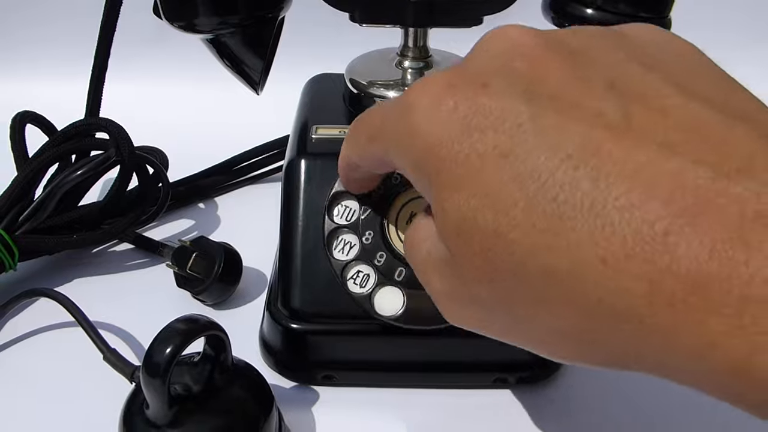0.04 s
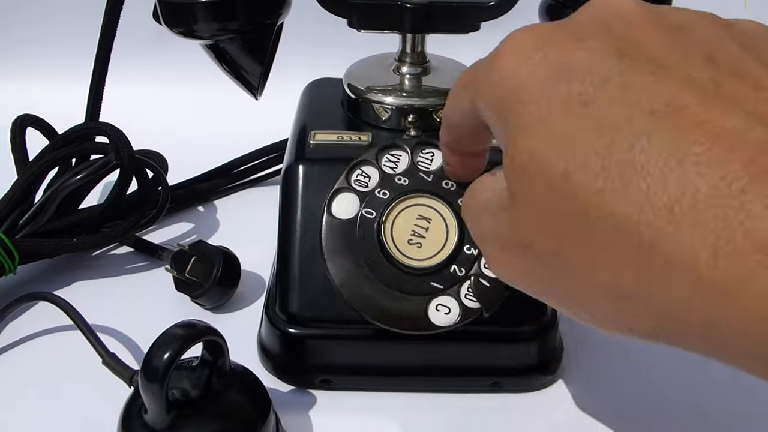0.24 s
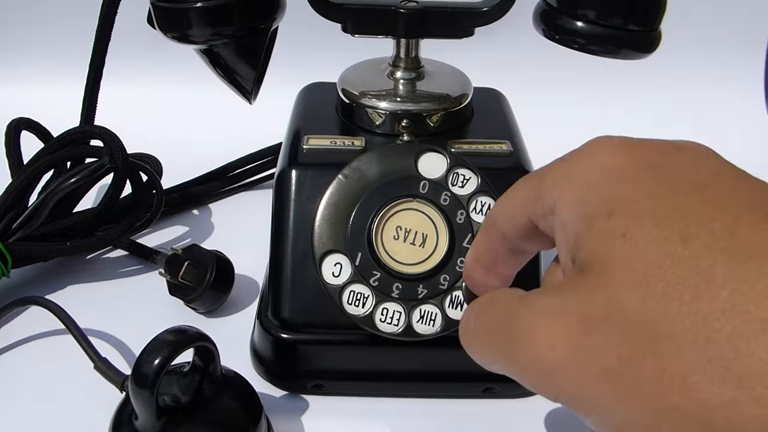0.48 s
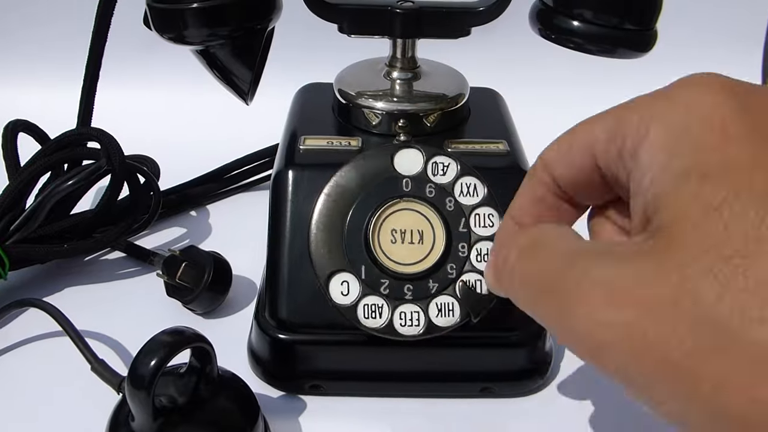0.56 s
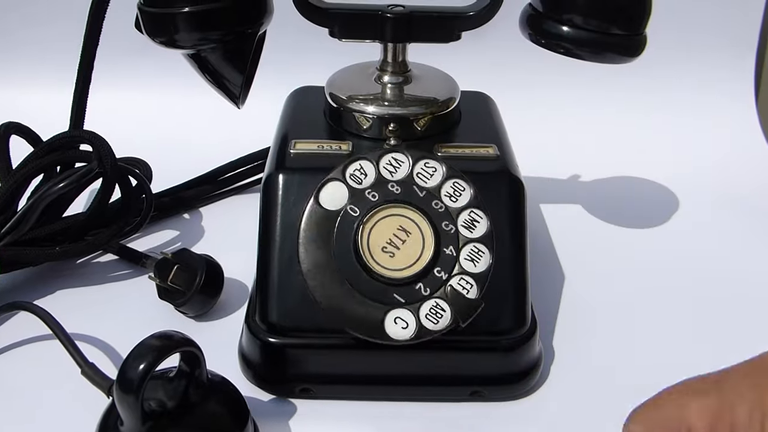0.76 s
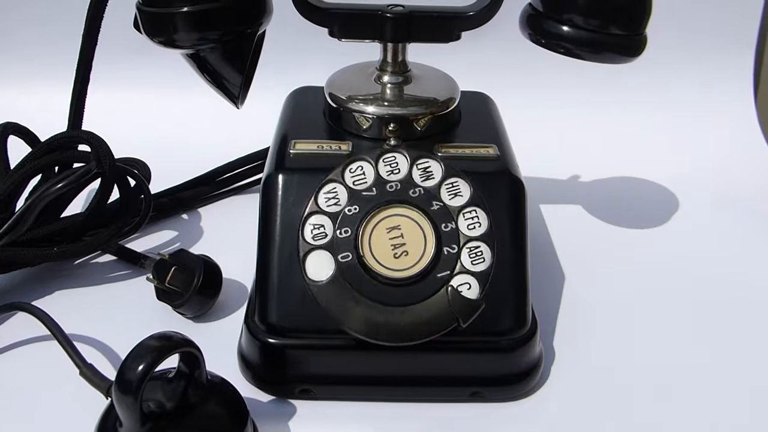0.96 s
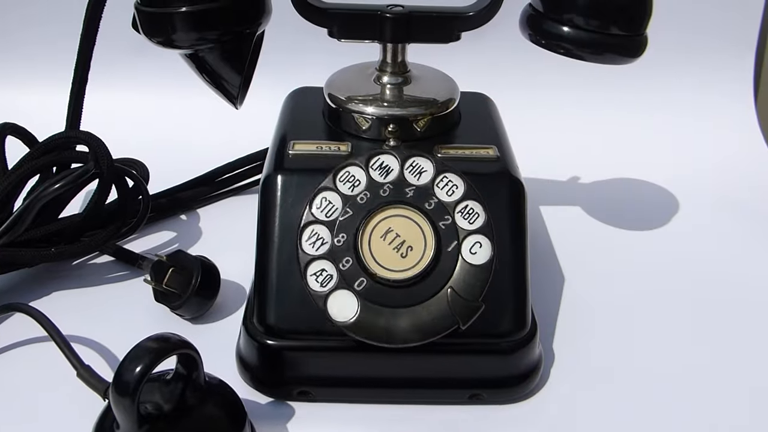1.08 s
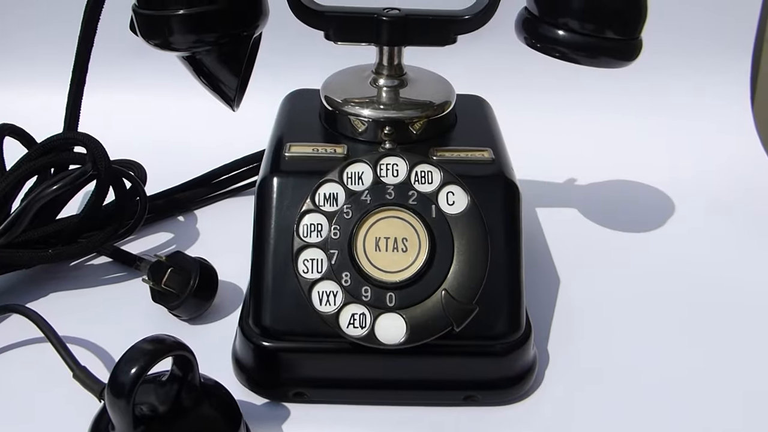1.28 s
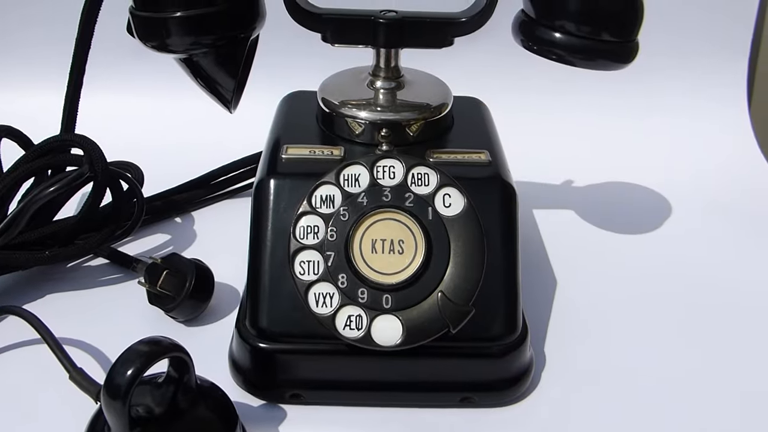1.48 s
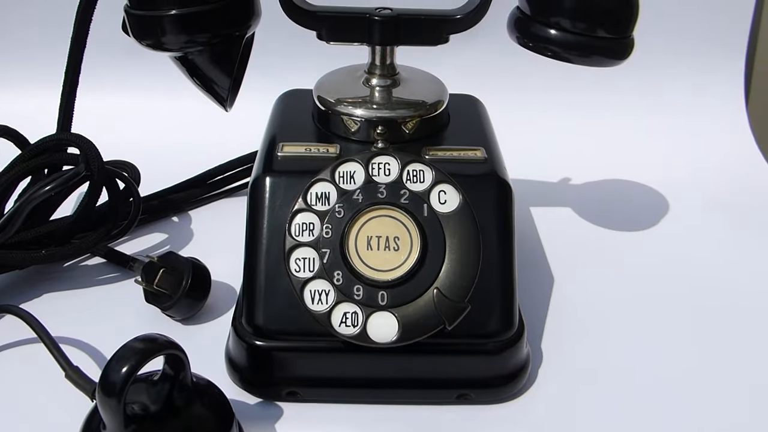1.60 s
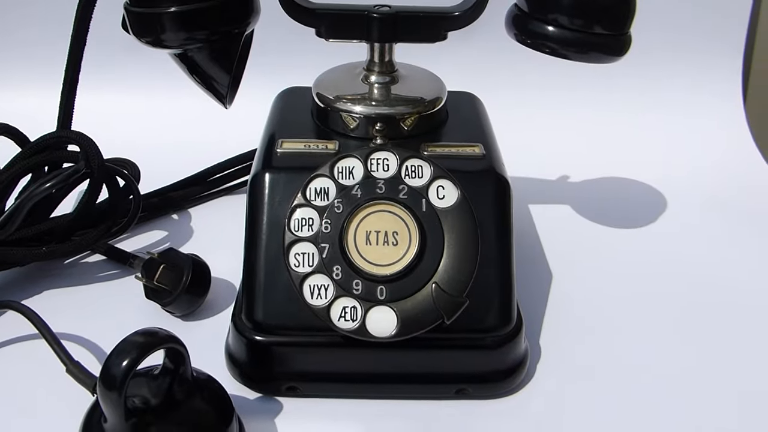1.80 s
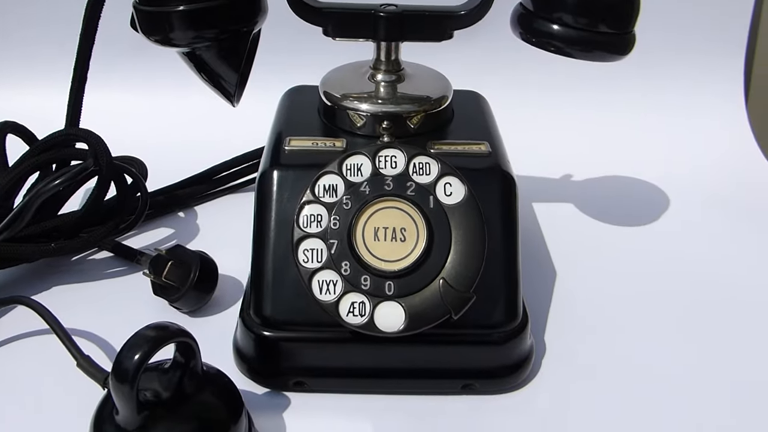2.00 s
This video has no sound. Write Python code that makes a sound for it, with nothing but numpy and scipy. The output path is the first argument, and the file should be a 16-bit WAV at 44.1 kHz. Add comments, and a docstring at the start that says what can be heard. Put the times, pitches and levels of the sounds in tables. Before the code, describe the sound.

An old rotary phone dial is wound with quick ticks and whirs home.

```python
"""A quiet room, close to an old rotary telephone on which one digit is dialled.
A pawl ticks over its ratchet as the wheel is wound. The wheel clacks at the finger stop and again as it
is let go, whirs home against its governor with chirps and squeaks, then clacks and clicks to rest.
The contacts ring the metal dial, and the clacks also ring the case. Under it lie a few dull bumps,
outdoor air and a faint distant engine; a low hum swells at the end."""
import sys
import numpy as np
from scipy import signal
from scipy.fft import rfft, irfft
from scipy.io import wavfile
from scipy.ndimage import uniform_filter1d

SR = 44100
rng = np.random.default_rng(int(sys.argv[2]) if len(sys.argv) > 2 else 0)


def master(y):
    """Save y as 16-bit WAV."""
    cut = np.clip(np.atleast_2d(y).T, -1, 1)
    pcm = np.round(cut * 32767)  # scale
    wavfile.write(sys.argv[1], SR, pcm.astype(np.int16))


N = 90404

# ringing modes of the metal dial (frequency [Hz], level [dB], t60 [s])
DIAL_MODES = [(2700, -9, .06), (3060, -7, .07), (3200, -5, .07), (3570, -10, .05), (4020, -7, .07),
              (4470, -8, .06), (5100, -2, .13), (5690, -8, .05), (6650, -9, .07), (7960, -3, .11),
              (8516, -7, .11)]


def amp(db):
    """Decibels to gain."""
    return 10 ** (np.asarray(db) / 20)


def clock():
    """Time of every sample, in seconds."""
    return np.arange(N) / SR


def curve(rows, column=1):
    """An automation curve: straight lines between points in time."""
    rows = np.array(rows)
    return np.interp(clock(), rows[:, 0], rows[:, column])


def over_bins(rows, column=1):
    """Spread a column of a frequency table over the FFT bins, on a log-frequency scale."""
    rows = np.array(rows)
    bin_hz = np.arange(N + 1) * SR / (2 * N)
    return np.interp(np.log(bin_hz + 1), np.log(rows[:, 0]), rows[:, column])


def shape(x, gain):
    """Filter by a gain for each bin."""
    return irfft(rfft(x, 2 * N) * gain)[..., :N]


def colour(x, rows):
    """Minimum-phase EQ, so nothing sounds ahead of an attack; keeps the power of white noise."""
    gain = amp(over_bins(rows))
    gain /= np.sqrt(np.mean(gain ** 2))
    cepstrum = irfft(np.log(gain))
    cepstrum[1:N] *= 2
    cepstrum[N + 1:] = 0
    return shape(x, np.exp(rfft(cepstrum)))


def fade(t, t60):
    """Exponential decay, 60 dB down after t60 seconds."""
    return np.exp(-np.log(1000) * np.maximum(t, 0) / t60)


def ring(x, modes):
    """Drive a set of decaying modes; keeps the power of white noise."""
    t = clock()[:N // 4]
    response = sum(amp(db) * np.sin(2 * np.pi * hz * t) * fade(t, t60) / np.sqrt(t60)
                   for hz, db, t60 in modes)
    return shape(x, rfft(response / np.linalg.norm(response), 2 * N))


def diffuse(x, t60):
    """A dense reverb tail made of decaying noise."""
    response = rng.standard_normal(N) * fade(clock(), t60)
    return shape(x, rfft(response / np.linalg.norm(response), 2 * N))


def blow(start, db, rise, t60):
    """Force envelope of one contact: a quick rise, then decay (times in seconds)."""
    t = clock() - start
    return amp(db) * np.clip(t / rise, 0, 1) * fade(t - rise, t60)


def tap(force):
    """The whole energy of a contact as one push at its peak."""
    return np.linalg.norm(force) * (np.arange(N) == np.argmax(force))


def drift(rate_hz):
    """Smooth random wander, spread near 1."""
    hold = int(SR / rate_hz)
    steps = np.repeat(rng.standard_normal(N // hold + 1), hold)
    return uniform_filter1d(steps, hold)[:N]


def chatter():
    """Even, very fast chatter of two hard surfaces in contact, rms 1."""
    return rng.choice([-1., 1.], N)


def grit(grains_per_s=4600, flurry_db=1.72):
    """Dense tiny collisions of uneven size that come in brief flurries, rms 1."""
    hits = rng.random(N) < grains_per_s / SR
    size_db = np.minimum(rng.exponential(size=N), 5) + flurry_db * drift(rate_hz=200)
    grains = hits * rng.choice([-1, 1], N) * amp(size_db)
    return grains / np.std(grains)


def wavering_tone(hz, waver=0.029, rate_hz=600):
    """A sine of amplitude 1 whose pitch wanders by about the fraction `waver`."""
    pitch_hz = hz * (1 + waver * drift(rate_hz))
    return np.sin(2 * np.pi * np.cumsum(pitch_hz) / SR)


def outdoor_air(end_db=-49.5, fade_db_per_s=2.5):
    """A stereo bed of distant outdoor noise, slowly fading."""
    # tone of the air (frequency [Hz], relative level [dB])
    air_eq = [(25, -63), (50, -35), (75, -19.5), (110, -16.5), (160, -14.5), (220, -5), (330, -7),
              (550, -11.5), (900, -10.5), (1300, -17.5), (3000, -29.5), (8000, -31.5), (9000, -35.5),
              (16000, -44)]
    # stereo width (frequency [Hz], side minus mid [dB])
    width = [(40, -4), (130, -20.5), (300, -22.5), (640, -9), (1400, -7.5), (8000, -4)]
    mid, side = colour(rng.standard_normal((2, N)), air_eq)
    side = shape(side, amp(over_bins(width)))
    level_db = end_db + fade_db_per_s * (N / SR - clock())
    return np.array([mid + side, mid - side]) * amp(level_db)


def engine_drone():
    """A distant engine swells and ebbs as its pitch sinks."""
    # course of the drone (time [s], pitch [Hz], rms level [dB])
    course = [(0, 160.6, -75), (.35, 157, -52.5), (.6, 155, -68.5), (1.2, 151, -55.5), (1.45, 147.7, -59.5),
              (1.68, 145.8, -55), (2.05, 130.3, -67)]
    tone = wavering_tone(curve(course), waver=0.0081, rate_hz=11.5)
    return np.sqrt(2) * tone * amp(curve(course, column=2))


def clicks():
    """Small metal parts click as the works take up or settle, leaving the dial ringing faintly."""
    # light contacts (time [s], level [dB])
    contacts = [(0.038, -42), (0.0458, -25.5), (1.484, -43.5), (1.524, -44), (1.5437, -37.5), (1.556, -37),
                (1.5634, -20), (1.593, -39.5), (1.616, -51.5)]
    # tone of a click (frequency [Hz], relative level [dB])
    click_eq = [(710, -28), (1200, -6.5), (2080, -5.5), (2500, -8), (3050, 0), (3600, -5.5), (4050, 7.5),
                (4400, -3), (5470, -1), (7170, -4), (8200, 7), (9200, -19.5), (11600, -14), (16000, -22)]
    blows = [blow(start, db, rise=0.0011, t60=0.038) for start, db in contacts]
    snap = colour(chatter() * sum(blows), click_eq)
    return snap + amp(-10.5) * ring(sum(map(tap, blows)), DIAL_MODES)


def winding(rise_s=0.00059):
    """The pawl ticks faster as the wheel speeds up and pings at each fall, over the rub of the gears."""
    # the pawl falling over the ratchet teeth (time [s], level [dB])
    falls = [(0.082, -39), (0.129, -42.5), (0.1607, -35), (0.1886, -41), (0.2087, -31), (0.2301, -28),
             (0.2504, -27.5), (0.268, -27), (0.2843, -41), (0.297, -27.5), (0.313, -30), (0.3248, -27.5),
             (0.3415, -23.5), (0.362, -28), (0.37, -28.5), (0.383, -26.5), (0.3957, -23), (0.407, -20.5),
             (0.414, -36.5), (0.4202, -32), (.4316, -25.5), (0.446, -23.5), (0.458, -31.5), (0.4647, -28),
             (.482, -31), (0.494, -26.5), (0.4994, -30), (0.507, -35), (.520, -25.5)]
    # the pawl's own note, rising as the spring tightens (time [s], pitch [Hz])
    pawl_note = [(.3, 3087), (.42, 3206)]
    # tone of a tick (frequency [Hz], relative level [dB])
    tick_eq = [(500, -26), (1500, -0.5), (2500, -8.5), (4000, 1.5), (6200, 2.5), (7300, 2), (8500, -1),
               (9100, -20.5), (10800, -15), (15500, -20)]
    # rubbing of the gears (time [s], level [dB])
    rub_levels = [(0, -68), (.15, -62.5), (.2, -45), (.29, -41.5), (.36, -36.5), (.43, -38), (.525, -37.5),
                  (.575, -45), (.605, -43), (.625, -51)]
    # tone of the rub (frequency [Hz], relative level [dB])
    rub_eq = [(300, -21.5), (600, 3), (812, -8), (1030, 0.5), (2050, 0.5), (2470, -2.5), (3100, -0.5),
              (3500, -6), (6200, -0.5), (8500, -9), (9200, -18.5), (11000, -19), (15500, -23)]
    t = clock()
    ticks = chatter() * sum(blow(start, db, rise_s, t60=0.026) for start, db in falls)
    rub = grit() * amp(curve(rub_levels)) * (t < rub_levels[-1][0])
    pings = np.zeros(N)
    for start, tick_db in falls:
        hz = np.interp(start, *np.transpose(pawl_note))
        ping_db = -19 + 0.5 * tick_db  # the pings are more even than the ticks
        pings += blow(start, ping_db, rise_s, t60=0.048) * np.sin(2 * np.pi * hz * (t - start))
    dial = ring(amp(-15) * ticks + amp(-6) * rub, DIAL_MODES)
    return colour(ticks, tick_eq) + colour(rub, rub_eq) + pings + dial


def clacks():
    """Hard blows on the finger stop, or drier ones inside the works, ring the dial and the case."""
    # the wheel striking and rattling at its stops
    # (time [s], level [dB], rise [s], t60 [s], send to the case [dB], part struck)
    strikes = [(0.531, -9.5, 0.00098, 0.0051, -29, "stop"), (.534, -23, 0.001, 0.043, -7.5, "stop"),
               (0.5437, -20.5, 0.0012, 0.044, -28, "stop"), (0.5457, -13, 0.00554, 0.037, -22.5, "stop"),
               (0.61, -31, 0.00031, 0.012, -6, "stop"), (0.6224, -18.5, 0.0024, 0.043, -32, "stop"),
               (.627, -13.5, 0.0013, 0.02, -12, "stop"), (0.638, -27, 0.00107, 0.047, -1.5, "stop"),
               (1.373, -16, 0.00082, 0.017, -6.5, "works"), (1.3755, -13, 0.0004, 0.02, -35, "works"),
               (1.3809, -13.5, 0.0022, 0.043, -22, "works")]
    # tone of the finger stop (frequency [Hz], relative level [dB])
    stop_eq = [(180, -42), (300, -15), (488, -12.5), (1310, -12), (1700, -18.5), (2030, -6.5), (2440, -10),
               (3200, 1.5), (3700, -3), (4450, 2.5), (4930, -6.5), (5640, -1), (7380, 0), (8440, -1.5),
               (9330, -19), (11600, -9), (15700, -16), (16500, -41)]
    # tone of the works (frequency [Hz], relative level [dB])
    works_eq = [(180, -38), (462, -9), (814, -22), (1230, -11), (1400, -21.5), (1690, -9), (2200, -27),
                (2740, 1), (3000, 4), (3500, -7), (4910, -7), (5800, -6), (7200, -11), (8100, -5.5),
                (9240, -22.5), (11000, -19.5), (16000, -24)]
    # ringing modes of the case (frequency [Hz], level [dB], t60 [s])
    case_modes = [(265, -10.5, 0.11), (457.5, 1, 0.08), (706, -5, 0.038), (1127, -4, 0.12),
                  (1290, -3.5, 0.099)]
    out = np.zeros(N)
    for part, eq, dial_db in (("stop", stop_eq, -15), ("works", works_eq, -21)):
        blows = [(blow(start, db, rise, t60), amp(case_db))
                 for start, db, rise, t60, case_db, struck in strikes if struck == part]
        force = chatter() * sum(push for push, _ in blows)
        shove = sum(tap(push) * send for push, send in blows)
        crack = colour(force + amp(-29) * diffuse(force, t60=0.088), eq)
        out += crack + amp(dial_db) * ring(force, DIAL_MODES) + ring(shove, case_modes)
    return out


def governor(turn_hz=20.87, tooth_hz=127):
    """The spinning brake whirs in its cup, pulsing with each turn and each gear tooth."""
    # rubbing of the brake on the way home (time [s], level [dB])
    rub_levels = [(.65, -42.5), (.70, -36), (.725, -31.5), (.815, -30.5), (.83, -35), (.86, -29.5),
                  (.918, -32.5), (.937, -30.5), (.975, -33.5), (1.02, -31.5), (1.045, -28), (1.12, -30.5),
                  (1.235, -32.5), (1.255, -36), (1.269, -28.5), (1.305, -36), (1.338, -31), (1.375, -38)]
    # tone of the whir (frequency [Hz], relative level [dB])
    whir_eq = [(240, -30.5), (400, -7), (595, -11.5), (942, -14.5), (1280, -5), (1960, -8), (2400, -11.5),
               (2700, 2), (3050, -3), (3360, -4), (4090, -2.5), (4560, -13.5), (5100, -2.5), (5390, -15),
               (5730, -1.5), (6190, -9), (6700, -6), (7500, -9), (8280, -6), (9210, -20), (10600, -14),
               (15500, -27)]
    t = clock()
    wobble_db = 0.88 * np.cos(2 * np.pi * turn_hz * (t - 1.19))  # it runs slightly out of true
    tooth_phase = np.cumsum(tooth_hz * (1 + 0.032 * drift(rate_hz=7.2))) / SR % 1
    tooth_db = -0.75 - 3 * tooth_phase
    running = (t > rub_levels[0][0]) & (t < rub_levels[-1][0])
    rub = grit() * running * amp(curve(rub_levels) + wobble_db + tooth_db)
    return colour(rub, whir_eq) + amp(-16) * ring(rub, DIAL_MODES)


def cam_chirps(pulses=6, first_s=0.86, period_s=0.089):
    """The cam gives one high stick-slip chirp for each dialling pulse."""
    envelope = sum(blow(first_s + k * period_s, db=-29, rise=0.004, t60=0.068) for k in range(pulses))
    return envelope * wavering_tone(hz=7040)


def brake_squeaks():
    """The brake catches now and then on the way home with a short stick-slip squeak."""
    # catches of the brake (time [s], level [dB])
    catches = [(.860, -39), (.930, -32), (1.146, -35), (1.218, -30), (1.266, -26.5)]
    envelope = sum(blow(start, db, rise=0.004, t60=0.11) for start, db in catches)
    return envelope * wavering_tone(hz=2960)


def bumps():
    """Soft knocks, each with a short low boom at its own pitch."""
    # dull knocks (time [s], level [dB], t60 [s], boom against knock [dB], boom pitch [Hz])
    knocks = [(1.028, -21.5, 0.063, -3, 236.6), (1.047, -26.5, 0.047, -4, 295),
              (1.062, -28.5, 0.034, 3, 185), (1.07, -32, 0.14, -9, 184), (1.3402, -26, 0.058, -5, 417),
              (1.484, -45, 0.038, 4.5, 257)]
    # tone of a knock (frequency [Hz], relative level [dB])
    knock_eq = [(60, -3), (130, -8), (240, -4), (500, -4), (800, -7.5), (1100, -12), (1450, -8.5),
                (1800, -17.5), (3000, -40), (8000, -66)]
    force, booms = np.zeros((2, N))
    for start, db, t60, boom_db, hz in knocks:
        force += blow(start, db, rise=0.0025, t60=t60)
        tone = np.sin(2 * np.pi * hz * (clock() - start))
        booms += blow(start, db + boom_db, rise=0.0079, t60=0.085) * tone
    return colour(force * chatter(), knock_eq) + booms


def distant_hum():
    """A faint low hum swells in the distance at the end."""
    # swell of the hum (time [s], level [dB])
    swell = [(1.8, -74), (1.93, -50)]
    return wavering_tone(hz=208) * amp(curve(swell))


def bass_cut(x, low_cut_hz=150):
    """Takes out the deep bass below the cut."""
    return signal.sosfilt(signal.butter(4, low_cut_hz, "high", fs=SR, output="sos"), x)


def stereo_pickup(x):
    """The treble favours the right microphone port; nearby surfaces scatter differently to each."""
    # the two ports (frequency [Hz], left minus right [dB], left phase lead [rad])
    ports = [(1200, -.7, 0), (2400, 0, 0), (4600, -.8, -.1), (6500, -3, -.5), (8300, -6, -1.05),
             (10000, -10, -2.4), (12600, -15, -5.3), (16000, -14, -6.1)]
    # nearby reflections (frequency [Hz], level against the direct sound [dB])
    scatter = [(100, -32), (380, -24), (700, -14), (1300, -19), (2000, -30), (3300, -29), (4400, -19),
               (8000, -11), (15000, -10)]
    left = amp(over_bins(ports)) * np.exp(1j * over_bins(ports, column=2))
    gains = np.array([left, np.ones(N + 1)])
    gains /= abs(gains.mean(axis=0))  # keeps the direct sound flat in mono
    near = np.array([shape(diffuse(x, t60=0.0071), amp(over_bins(scatter))) for _ in range(2)])
    room = amp(-16) * diffuse(x, t60=0.13)
    return shape(x + near + room, gains)


def scene():
    """The dial is wound, let go and runs home, close up over a faint distant bed."""
    close = winding() + clacks() + governor() + cam_chirps() + brake_squeaks() + clicks() + bumps()
    return stereo_pickup(bass_cut(close)) + outdoor_air() + engine_drone() + distant_hum()


def record(dry):
    """A steep low-pass takes off the very top."""
    top_hz = 15900
    return signal.sosfilt(signal.ellip(8, .2, 70, top_hz, fs=SR, output="sos"), dry)


dry = scene()
out = record(dry)
master(out)
```